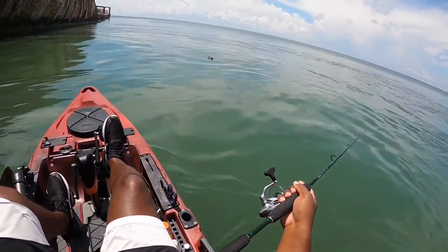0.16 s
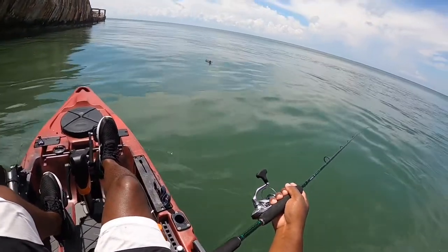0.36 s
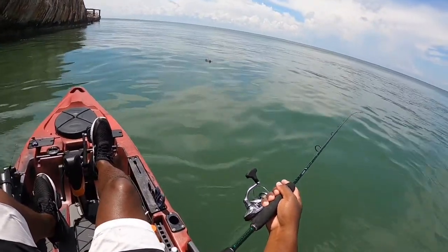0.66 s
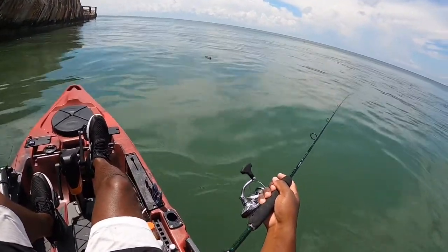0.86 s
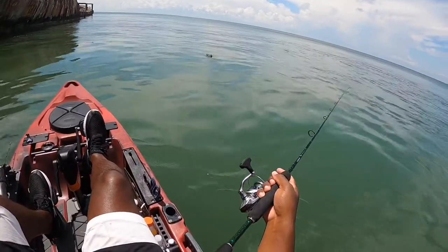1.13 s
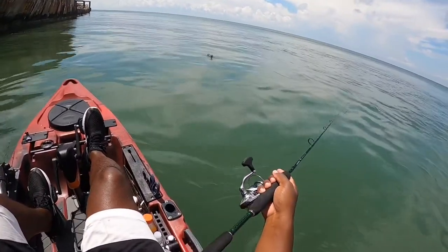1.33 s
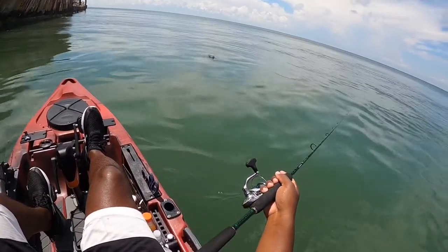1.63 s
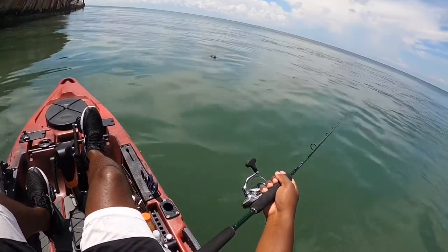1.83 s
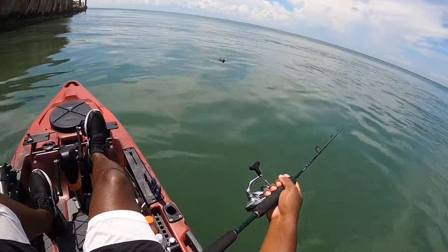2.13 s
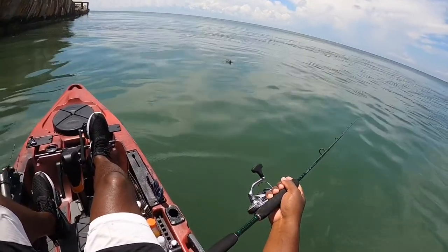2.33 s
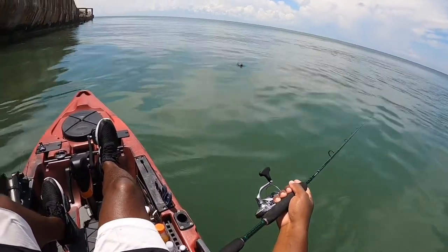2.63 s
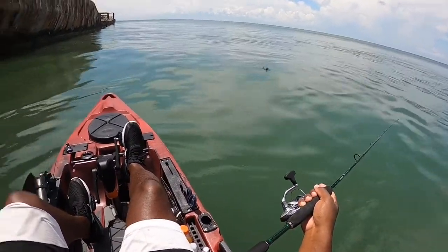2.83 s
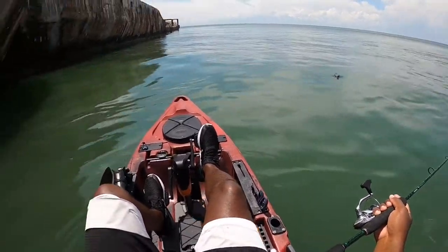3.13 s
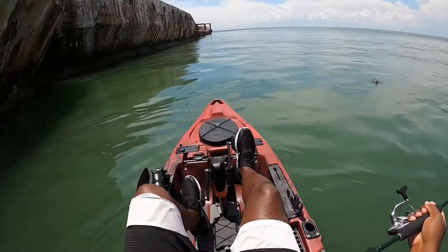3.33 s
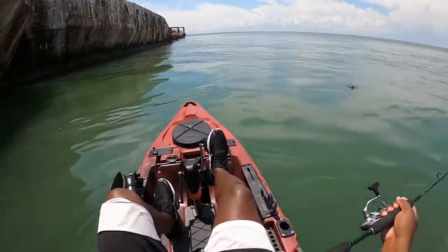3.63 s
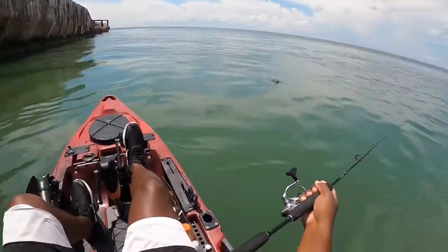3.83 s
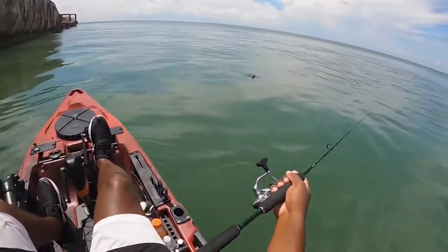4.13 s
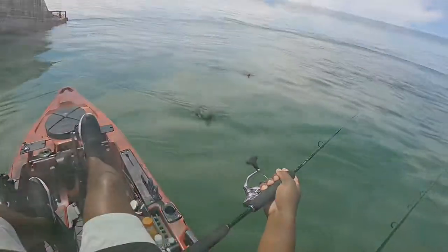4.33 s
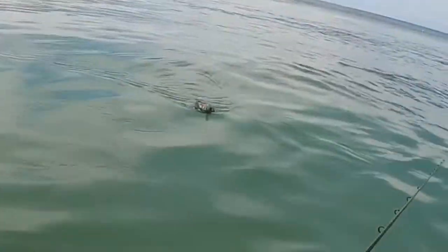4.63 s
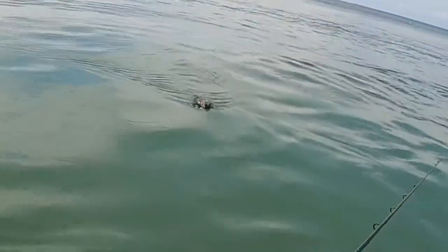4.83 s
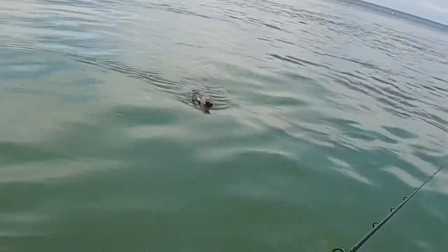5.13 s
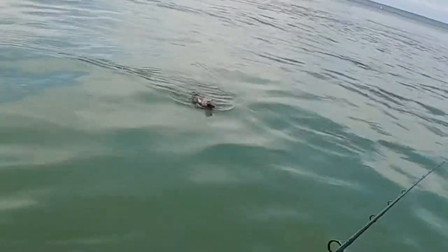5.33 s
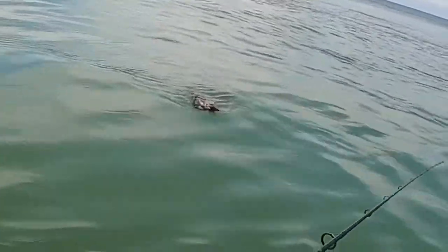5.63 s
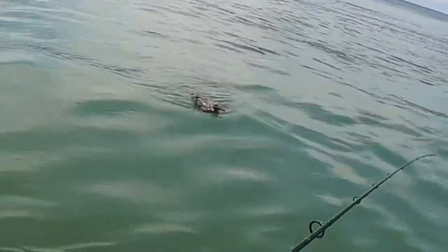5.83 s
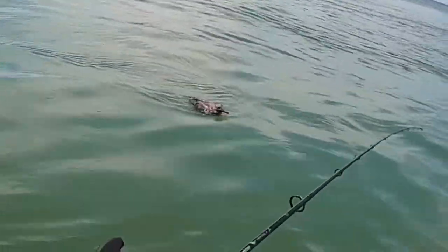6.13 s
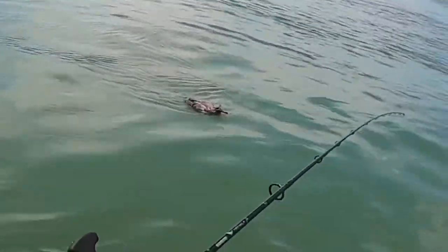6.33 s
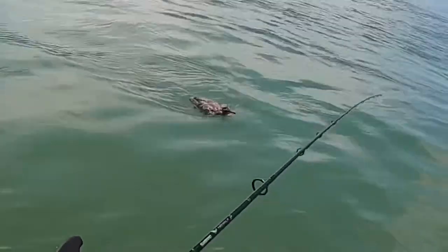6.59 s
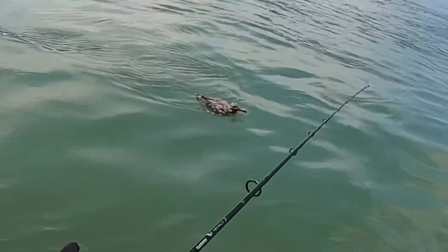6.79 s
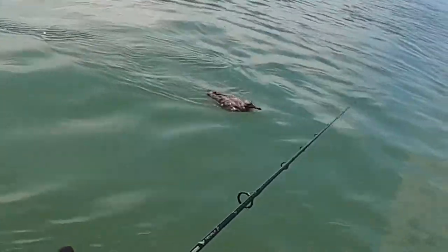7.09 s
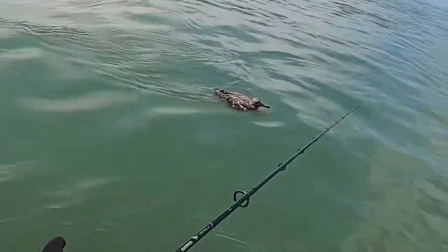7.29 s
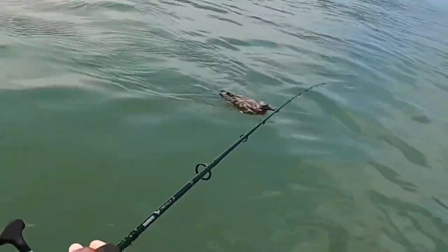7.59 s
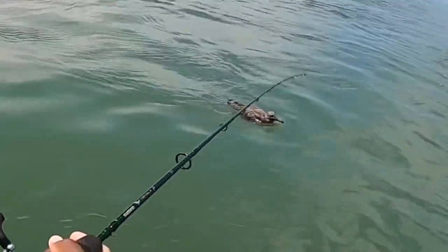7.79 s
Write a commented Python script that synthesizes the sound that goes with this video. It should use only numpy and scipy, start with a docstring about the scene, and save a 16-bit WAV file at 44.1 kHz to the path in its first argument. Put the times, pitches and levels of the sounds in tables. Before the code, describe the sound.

A gull chick close on the left gives short creaky peeps, mostly in pairs, and three much louder high wails that slide down and end in a rasp. Underneath, calm water rumbles softly against a hollow kayak hull and light wind puffs on the microphone, strongest near the end. A seabird whistles briefly at the start, and a colony cries very faintly far away.

```python
"""From a kayak on calm water: the hollow hull rumbles and light wind puffs on the microphone throughout.
A seabird whistles overhead at the start, and a colony murmurs far off. After a second, creaky gull
peeps begin close on the left, where a chick swims. Three long wails fall at about 2.5, 4.3 and 6.2 s;
each also arrives by a near bounce, so it swells and dips as its pitch slides. Two fainter whistles
and the strongest gusts come near the end."""
import sys
import numpy as np
from scipy import signal
from scipy.fft import rfft, irfft, next_fast_len
from scipy.io import wavfile
from scipy.ndimage import uniform_filter1d, map_coordinates

SR = 44100
rng = np.random.default_rng(int(sys.argv[2]) if len(sys.argv) > 2 else 0)


def dump_mix(stems):
    """Bounce the given channels to the path in sys.argv[1] as a 16-bit WAV at rate SR."""
    frames = np.atleast_2d(stems).T  # one column per channel
    limited = np.clip(frames, -1, 1)  # hard clip at full scale
    pcm = np.round(limited * 32767).astype(np.int16)
    wavfile.write(sys.argv[1], SR, pcm)


N = 350696
TOP_HZ = 15000  # band limit of the microphone


def amp(db):
    """Decibels to gain."""
    return 10 ** (np.asarray(db) / 20)


def unit(x):
    """Scale to rms 1."""
    return x / np.sqrt(np.mean(x ** 2) + 1e-20)


def along(points, hz):
    """Read (Hz, value) points on a log axis."""
    knots_hz, values = np.transpose(points)
    return np.interp(np.log(hz + 1), np.log(knots_hz + 1), values)


def curve(points):
    """Read (seconds, value) points at every sample."""
    return np.interp(np.arange(N) / SR, *np.transpose(points))


def wobble(rate, size):
    """A smooth random curve, rate knots a second."""
    knots = rng.standard_normal(int(size * rate / SR) + 4)
    return map_coordinates(knots, [np.arange(size) * rate / SR])


def flicker(count, size, depth_db, rate):
    """Gains that let each of count partials waver on its own."""
    return amp(depth_db * np.array([wobble(rate, size) for _ in range(count)]))


def envelope(t, attack_s, hold_s, release_s):
    """Gain that rises 60 dB up to t = 0, holds, then dies away by 60 dB."""
    return amp(-60 * (np.maximum(-t, 0) / attack_s + np.maximum(t - hold_s, 0) / release_s))


def fade(size, seconds):
    """A gate with soft ends."""
    return signal.windows.tukey(size, min(1, 2 * seconds * SR / size))


def filtered(x, response):
    """Filter x by a response given as a function of Hz."""
    size = x.shape[-1]
    padded = next_fast_len(size + 8192)
    return irfft(rfft(x, padded) * response(np.fft.rfftfreq(padded, 1 / SR)), padded)[..., :size]


def add(track, s, sound, pan_db=0):
    """Mix a sound into a stereo track at time s, pan_db louder on the left, keeping its power."""
    ratio = amp(pan_db)
    pair = np.array([sound * ratio, sound]) * np.sqrt(2 / (1 + ratio ** 2))
    start = max(0, round(s * SR))
    part = track[:, start:start + len(sound)]
    part += pair[:, :part.shape[1]]


def cycles(pitch, jitter, rate=900):
    """Phase in radians of a vibration whose pitch trembles."""
    return 2 * np.pi * np.cumsum(pitch * (1 + jitter * wobble(rate, len(pitch)))) / SR


def partials(phase, pitch, throat, orders, weights=1):
    """Lines on multiples of a pitch at rms 1; the throat colours them and smears each pulse."""
    k = np.asarray(orders)[:, None]
    gain = amp(along(throat, k * pitch)) * weights * (k * pitch < TOP_HZ)
    rms = np.sqrt((gain ** 2).sum(0) / 2 + 1e-12)
    return (gain * np.cos(k * phase - 2 * k ** 2)).sum(0) / rms


def noise(spectrum, size):
    """Coloured noise of rms 1."""
    return unit(filtered(rng.standard_normal(size), lambda hz: amp(along(spectrum, hz))))


def rush(spectrum, correlation, patchy_db):
    """Coloured stereo noise of rms 1 with drifting patches of gain."""
    frames = signal.stft(rng.standard_normal((2, N)), nperseg=1024)[2]
    patches = uniform_filter1d(rng.standard_normal(frames.shape[1:]), size=8, axis=0)
    patches = uniform_filter1d(patches, size=10, axis=1)
    pair = signal.istft(frames * amp(patchy_db * unit(patches)), nperseg=1024)[1][:, :N]
    width = np.arccos(correlation) / 2
    mid, side = filtered(pair, lambda hz: amp(along(spectrum, hz))) * [[np.cos(width)], [np.sin(width)]]
    return unit(np.array([mid + side, mid - side]))


def distant_hiss():
    """A faint hiss carries from far off on the left."""
    # Colour of the hiss. Each row: frequency in Hz, gain in dB.
    spectrum = [(300, 0.5), (500, 3.5), (800, -3), (1200, 2), (1700, -1), (2200, -5), (3300, -3),
                (4200, -6), (5300, -11), (6500, -15), (8000, -26), (10000, -36), (15000, -48.5)]
    # Its slow swell. Each row: time in seconds, level in dB.
    levels = [(0, -59), (.85, -70.5), (1.35, -63.5), (2.1, -61.5), (2.7, -63.5), (3.8, -62), (4.3, -63),
              (5.2, -65), (5.9, -61), (6.5, -69), (7.95, -60.5)]
    return amp(curve(levels)) * rush(spectrum, correlation=0.45, patchy_db=1.8) * amp([[1.7], [-1.7]])


def wind():
    """Gusts ride on a breeze that differs between the microphone's two ports."""
    # Colour of the wind. Each row: frequency in Hz, gain in dB.
    spectrum = [(15, -9.5), (32, 7.5), (60, 3.5), (100, -6.5), (150, -22.5), (300, -34.5), (600, -55.5),
                (1500, -100)]
    # The steady breeze. Each row: time in seconds, relative level in dB.
    breeze_levels = [(0.0, -38), (3.3, -47.5), (4.07, -27), (4.69, -48.5), (5.64, -38.5), (7.02, -43.5),
                     (7.48, -31.5), (7.95, -40)]
    # Gusts. Each row: time of full strength in seconds, hold in seconds, level in dB.
    gusts = [(.01, 0.013, -26.5), (.41, 0.097, -25), (0.943, 0.016, -30), (1.95, 0.013, -31),
             (2.41, 0.1, -31), (3.36, .1, -36), (3.77, 0.044, -26), (4.08, 0.11, -24.5),
             (5.02, 0.0093, -33), (5.58, 0.046, -29), (5.92, .02, -28.5), (6.52, .02, -27),
             (7.189, 0.17, -34), (7.55, 0.062, -16.5), (7.829, 0.025, -17)]
    t = np.arange(N) / SR
    gusting = sum(amp(db) * envelope(t - s, attack_s=0.26, hold_s=hold, release_s=0.51)
                  for s, hold, db in gusts)
    breeze = amp(curve(breeze_levels) + 3 + 2 * wobble(10, N))
    return np.hypot(breeze, gusting) * rush(spectrum, correlation=0.1, patchy_db=1)


def hull_water():
    """Water rumbles against the hollow hull, nearly alike in both ports."""
    # Resonance of the hull. Each row: frequency in Hz, gain in dB.
    spectrum = [(55, -12), (85, -2.5), (105, -8.5), (125, -0.5), (155, -3), (185, 0), (230, -8.5),
                (280, -18.5), (340, -24.5), (400, -27.5), (520, -39.5), (680, -63.5), (1200, -97)]
    # Strength of the rumble. Each row: time in seconds, relative level in dB.
    levels = [(0.0, -48), (1.66, -38), (2.21, -45.5), (4.38, -40.5), (4.63, -38.5), (6.33, -39),
              (7.71, -35.5), (7.95, -34)]
    lapping = amp(curve(levels) + 3.5 + 1.5 * wobble(14, N))
    return lapping * rush(spectrum, correlation=0.97, patchy_db=1.2)


def wind_puffs():
    """Eddies push on the microphone's ports for a few cycles, out of step with each other."""
    # Each row: centre and length in seconds, relative level in dB, eddy rate in Hz, left over right in dB.
    eddies = [(0.404, 0.052, -13, 60, -23), (0.419, 0.033, -13.5, 141, -23), (0.482, 0.044, -11, 89.4, -30),
              (0.498, 0.027, -11.5, 155, -19), (0.519, 0.052, -16, 77, -8.5),
              (4.104, 0.0463, -7.5, 69.6, -7), (4.17, 0.035, -25, 110.4, 8),
              (7.546, 0.0326, -9.5, 168, -5.5), (7.563, .035, -11, 116, -1.5),
              (7.58, 0.0144, -2.5, 202, -0.5), (7.596, 0.065, -19, 65.5, -7)]
    out = np.zeros((2, N))
    for s, length, db, hz, pan_db in eddies:
        size = int(length * SR)
        for port, share in enumerate(unit(amp([pan_db / 2, -pan_db / 2]))):
            phase = cycles(np.full(size, float(hz)), jitter=0.26, rate=166.6) + rng.uniform(0, 2 * np.pi)
            push = np.sin(phase) + 0.26 * np.cos(2 * phase) + 0.087 * np.sin(3 * phase)
            out[port, round(s * SR) - size // 2:][:size] += amp(db) * share * push * np.hanning(size)
    return filtered(out, lambda hz: 1 / np.sqrt(1 + (hz / 340) ** 8))  # slow air makes only dull pushes


def clicks():
    """Short clicks and knocks, each a ring in one band; the one at 4.664 s is a gull peep snapping shut."""
    # Each row: start in seconds, level in dB, pitch in Hz, seconds to die by 60 dB.
    rings = [(.004, -26.5, 183, 0.17), (.01, -49.5, 2550, 0.18), (0.053, -39.5, 404, 0.24),
             (.057, -48.5, 1610, 0.056), (0.475, -43.5, 1490, 0.025), (.632, -51.5, 1530, 0.034),
             (.735, -58, 5330, 0.019), (.835, -58.5, 1480, 0.059), (1.327, -53.5, 4600, 0.033),
             (2.231, -40.5, 1520, 0.028), (2.23, -48, 4240, 0.062), (2.95, -39.5, 400, 0.073),
             (2.981, -47.5, 3800, 0.031), (4.146, -48.5, 4240, 0.0137), (4.219, -43, 530, 0.049),
             (4.221, -48, 1420, 0.028), (4.664, -33, 1550, 0.024)]
    out = np.zeros((2, N))
    t = np.arange(SR // 3) / SR
    attack = 1 - np.exp(-t / 0.00068)
    for s, db, hz, t60 in rings:
        band = [(hz / 4, -35), (hz / 1.5, -12), (hz, 0), (hz * 1.4, -12), (hz * 4, -60)]
        add(out, s, noise(band, len(t)) * amp(db - 60 * t / t60) * attack, pan_db=2.5)
    return out


def sea_wall(x):
    """A diffuse echo comes back off the rough sea wall."""
    # Decay of the echo. Each row: frequency in Hz, seconds to die by 60 dB.
    decay = [(300, 0.46), (1500, 0.27), (5000, 0.26), (12000, 0.077)]
    hz, t, frames = signal.stft(rng.standard_normal((2, SR // 2)), SR, nperseg=256)
    tail = signal.istft(frames * amp(-60 * t / along(decay, hz)[:, None]), SR, nperseg=256)[1]
    return signal.fftconvolve(x.mean(0)[None], tail / np.linalg.norm(tail[0]), axes=1)[:, :N]


def colony_cries(per_second):
    """Rows for far_birds: the colony's fainter cries, at chance moments."""
    draws = rng.uniform(-1, 1, (int(per_second * N / SR), 6))
    middle = [N / SR / 2, 0.28, 1793, 0.8, -76.5, 0.8]
    spread = [N / SR / 2, 0.12, 170, 0.15, 3, 0.25]
    return list(middle + draws * spread)


def far_birds():
    """Thin cries far to the left rise a little and fall away, broken by quick dips of pitch and level."""
    # Each row: start and length in seconds, pitch in Hz, end pitch ratio, level in dB, rasp from 0 to 1.
    cries = [(0.221, 0.4, 1755, 0.92, -72.5, 0), (0.945, 0.32, 1780, 1, -70.5, 0.06),
             (1.328, 0.086, 1830, .9, -62.5, 0.16), (1.475, 0.42, 1683, 0.74, -66, 0.5),
             (1.98, 0.16, 1684, 0.83, -65, 0.27), (2.241, 0.12, 1660, 0.9, -66, 0.45),
             (2.714, 0.39, 1718, 0.78, -66.5, 0.48), (3.55, 0.41, 1750, 0.43, -63.5, 0.38),
             (3.75, 0.27, 1737, 0.57, -66, 0.65), (4.131, 0.13, 1733, 0.97, -67.5, 0.2),
             (4.65, 0.09, 1785, 0.7, -63.5, 0.37), (4.979, 0.089, 1690, 0.81, -66.5, 0.2),
             (5.691, 0.1, 1806, 0.91, -60, 0.45), (6.611, 0.23, 1802, 0.88, -63, 0.18),
             (6.824, 0.21, 1402, 0.51, -63, 0.95), (7.188, 0.3, 1483, 0.86, -63, 0.69),
             (7.568, 0.1, 1780, 1, -58, 1)]
    # The seabirds' throat. Each row: frequency in Hz, gain in dB.
    throat = [(1300, -14.5), (1800, 1), (2600, 4.5), (3500, 0.5), (5200, -2.5), (7000, -22.5),
              (9000, -43.5)]
    out = np.zeros((2, N))
    orders = np.arange(1, 5)
    for s, length, hz, end_ratio, db, rasp in cries + colony_cries(per_second=7):
        size = int(length * SR)
        progress = np.arange(size) / SR / length
        dips = np.sin(cycles(np.full(size, 40.0), jitter=0.2, rate=30) / 2) ** 6
        contour = 1 - 0.032 * np.exp(-progress / 0.14) - (1 - end_ratio) * progress ** 3
        pitch = hz * contour * (1 - (0.023 + 0.049 * rasp) * dips)
        weights = flicker(len(orders), size, depth_db=3, rate=30)
        cry = partials(cycles(pitch, jitter=0.004 + 0.014 * rasp), pitch, throat, orders, weights)
        add(out, s, amp(db - 6 * dips) * cry * fade(size, 0.025), pan_db=5)
    return out


def whistles():
    """A seabird overhead whistles high arched notes, strongest on their second harmonic."""
    # Each row: start and length in seconds, first, top and last pitch in Hz, relative level in dB.
    notes = [(.005, 0.072, 3100, 3360, 2980, -35), (0.096, 0.047, 2720, 3090, 2680, -39),
             (0.172, 0.031, 2750, 2890, 2740, -38.5), (7.005, 0.03, 3000, 2930, 2800, -54),
             (7.497, 0.027, 2955, 2880, 2670, -45.5)]
    # Timbre of the whistle. Each row: multiple of the pitch, gain in dB.
    harmonics = [(1, -2.5), (2, 4), (3, -26)]
    out = np.zeros((2, N))
    for s, length, start_hz, top_hz, end_hz, db in notes:
        progress = np.linspace(0, 1, int(length * SR))
        arch = np.sin(np.pi * progress ** 1.3) ** 2
        foot_hz = np.where(progress ** 1.2 < 0.5, start_hz, end_hz)
        phase = cycles(foot_hz + (top_hz - foot_hz) * arch, jitter=0.018)
        note = sum(amp(level) * np.sin(k * phase) for k, level in harmonics)
        add(out, s, amp(db + 8.5 * (arch - 2.5)) * note * fade(len(note), 0.0032), pan_db=-3)
    return out


def creak(snap_hz, jitter, shimmer_db, band_hz):
    """The slack syrinx snaps slowly and unevenly; each pulse rings the throat."""
    # Throat resonances. Each row: centre in Hz, width in Hz, gain in dB.
    modes = [(530, 70, -7.5), (1030, 540, -4.5), (1473, 231, 4.5), (1777, 179, 0.5), (2500, 280, -19.5),
             (4220, 780, -28.5), (5920, 1300, -40)]

    def throat(hz):
        return sum((-1) ** k * amp(db) * 1j * hz * width / (centre ** 2 - hz ** 2 + 1j * hz * width)
                   for k, (centre, width, db) in enumerate(modes))

    size = len(snap_hz)
    turns = cycles(snap_hz, jitter, rate=250) / (2 * np.pi)
    snaps = np.diff(np.floor(turns), prepend=0) * amp(shimmer_db * rng.standard_normal(size))
    hiss = 0.45 * rng.standard_normal(size)
    band = signal.butter(3, band_hz, "bandpass", fs=SR, output="sos")
    return unit(signal.sosfilt(band, filtered(unit(snaps) + hiss, throat)))


def from_left(x, lag_ms):
    """Sound from the left reaches the right port a little later."""
    return np.array([x[0], filtered(x[1], lambda hz: np.exp(-2j * np.pi * hz * lag_ms / 1000))])


def peeps():
    """Each nearby peep creaks open, arches through a clear note with half-pitch lines, and creaks shut."""
    # Each row: time of the top in seconds, top pitch in Hz, then level, half-pitch lines
    # and left over right, all in dB.
    calls = [(1.013, 1002, -32, -6.5, 4.5), (1.24, 973, -32, -11, 3.5), (1.975, 1025, -28.5, -4.5, 6.5),
             (2.180, 986, -29.5, 1, 5.5), (3.487, 1053, -28.5, -2, 20), (3.672, 1045, -30, -6, 18),
             (4.628, 1046, -29.5, -5, 4.5), (4.828, 1012, -31, -1, 5), (6.396, 1001, -32.5, 3.5, 5.5),
             (6.590, 978, -34, -19, 2), (7.925, 999, -30.5, -7.5, 2)]
    # The gull's throat and bill. Each row: frequency in Hz, gain in dB.
    throat = [(450, -31.5), (750, -13), (1000, -5.5), (1500, -0.5), (2000, 1.5), (2250, -15), (2550, -21.5),
              (3100, -21), (4100, -20.5), (5000, -29.5), (6500, -53.5), (9500, -48.5), (14000, -83.5)]
    length_s, end_droop = 0.085, 0.21
    out = np.zeros((2, N))
    t = np.arange(-length_s / 2, length_s / 2, 1 / SR)
    arch = 1 - end_droop * (2 * t / length_s) ** 2
    clear = envelope(t + 0.009, attack_s=0.032, hold_s=0.019, release_s=0.086)
    opening = amp(-2) * envelope(t + 0.03, attack_s=0.04, hold_s=0.02, release_s=0.035)
    closing = amp(-6) * envelope(t - 0.035, attack_s=0.016, hold_s=0.003, release_s=0.02)
    orders = np.arange(1, 25) / 2
    for s, hz, db, half_db, pan_db in calls:
        pitch = hz * arch
        # the half-pitch lines fade towards the treble
        weights = np.where(orders % 1, amp(half_db - 3.9 * np.clip(orders - 2.5, 0, 2)), 1)[:, None]
        weights = weights * flicker(len(orders), len(t), depth_db=2.2, rate=45)
        note = partials(cycles(pitch, jitter=0.014), pitch, throat, orders, weights)
        rasp = creak(pitch * 1.35 / 4, jitter=0.088, shimmer_db=2.5, band_hz=(997, 2800))
        voice = clear * note + (opening + closing) * rasp
        add(out, s + t[0], amp(db) * voice * fade(len(t), 0.0031), pan_db)
    return out


def near_bounce(x, strength_db):
    """Direct sound and a near bounce interfere at evenly spaced pitches; the right port lies in shadow."""
    # Paths to the left port, then the right. Each row: direct gain in dB, relative bounce gain in dB,
    # bounce delay in milliseconds.
    paths = [(1.5, -6.66, 3.07), (-20, -6.5, 3.05)]
    ports = []
    for port, (direct_db, bounce_db, delay_ms) in zip(x, paths):
        direct, bounce = amp(direct_db), amp(bounce_db + strength_db)
        delay_s = delay_ms / 1000
        ports.append(filtered(port, lambda hz: direct + bounce * np.exp(-2j * np.pi * hz * delay_s)))
    return np.array(ports)


def wail_voice(pitch, snap_hz, rough, tone_db, overtone_db):
    """A strong fundamental under wavering overtones; roughness trades both for creak and hiss."""
    # Colour of the overtones. Each row: frequency in Hz, gain in dB.
    throat = [(1800, 0), (2500, 7), (3100, 3), (3500, 1.5), (4000, 5), (4600, 0), (5250, -0.5),
              (5800, -1.5), (6400, -12.5), (7100, -21), (9000, -25), (13000, -37), (15500, -61.5)]
    size = len(pitch)
    phase = cycles(pitch, jitter=0.0024 + 0.05 * rough ** 2)
    clear = np.sqrt(1 - rough ** 2)
    rasp = creak(snap_hz, jitter=0.035, shimmer_db=4, band_hz=(430, 2820))
    tone = clear * np.sqrt(2) * np.cos(phase) + rough * rasp
    orders = np.arange(2, 15)
    weights = flicker(len(orders), size, depth_db=3, rate=45)
    slip = 0.04 * wobble(500, size)  # small slips of timing blur the high overtones most
    overtones = clear * partials(phase + slip, pitch, throat, orders, weights)
    hiss = (0.053 + 0.5 * rough ** 2) * noise(throat, size)
    release = np.clip(np.arange(size)[::-1] / (0.018 * SR), 0, 1)
    return (amp(tone_db) * tone + amp(overtone_db) * (overtones + hiss)) * fade(size, 0.0018) * release


def wails():
    """A near gull creaks into a low note, leaps up a register, then fades as it falls back into creak."""
    # Each row: time of the leap, low note before it and clear voice after it in seconds, tone in dB,
    # its fade in dB/s, overtones in dB, their fade in dB/s, bounce strength in dB.
    calls = [(2.478, .025, 0.18, -13, 79, -29.5, 97, -1), (4.336, .014, .25, -17, 39.5, -31.5, 55, -2),
             (6.192, 0.023, .218, -13.5, 64, -31.5, 56.5, 0)]
    # The fall of pitch, one list a wail. Each row: time in seconds, pitch in Hz.
    falls = [
        [(2.482, 1580), (2.53, 1500), (2.574, 1377), (2.602, 1208), (2.63, 1068), (2.64, 1001), (2.665, 912)],
        [(4.34, 1529), (4.41, 1509), (4.474, 1364), (4.512, 1199), (4.554, 1113), (4.576, 967), (4.6, 915)],
        [(6.198, 1574), (6.27, 1485), (6.296, 1368), (6.32, 1250), (6.362, 1157), (6.41, 1063), (6.422, 961),
         (6.44, 917)],
    ]
    lead_s, leap_s, tail_onset_s, tail_s = 0.039, 0.0015, 0.026, 0.072  # lead and tail are the creaks
    lead_snap_hz, low_hz = 526.6, 1349
    low_climb, tail_sink = 4800, 940  # Hz/s
    lead_swell, lead_brighten, low_swell, tail_dull = 378, 796, 218, 262.5  # dB/s
    out = np.zeros((2, N))
    for (s, low_s, clear_s, db, tone_fade, over_db, over_fade, bounce_db), fall in zip(calls, falls):
        t = np.arange(-low_s - lead_s, clear_s + tail_s, 1 / SR)  # zero at the leap
        until_low = np.maximum(-low_s - t, 0)
        into_fall = np.clip(t, 0, clear_s)
        into_tail = np.maximum(t - clear_s, 0)
        opening = np.clip(until_low / leap_s, 0, 1)
        low = np.clip(0.5 - t / leap_s, 0, 1)

        high_hz = np.interp(s + t, *np.transpose(fall)) - tail_sink * into_tail
        pitch = low * (low_hz + low_climb * t) + (1 - low) * high_hz
        snap_hz = np.where(t < 0, lead_snap_hz, pitch / 3)
        crack = 0.26 * np.exp(-(t / leap_s) ** 2)
        closing = 0.72 * np.clip(into_tail / tail_onset_s, 0, 1)
        rough = np.clip(opening + crack + closing, 0, 1)

        onset_db = -6.5 * opening - lead_swell * until_low + low_swell * np.clip(t, -low_s, 0)
        tone_db = db + onset_db - tone_fade * into_fall
        dull_db = lead_brighten * until_low + over_fade * into_fall + tail_dull * into_tail
        overtone_db = over_db + low - dull_db  # the low note is 1 dB brighter
        call = np.zeros((2, N))
        add(call, s + t[0], wail_voice(pitch, snap_hz, rough, tone_db, overtone_db))
        out += near_bounce(call, bounce_db)
    return out


def scene():
    """Near gulls and distant birds with their echo off the sea wall, over the boat and the weather."""
    gulls = wails() + from_left(peeps(), lag_ms=0.061)
    distant = far_birds() + whistles()
    echo = amp(-19) * sea_wall(gulls) + amp(-9) * sea_wall(distant)
    return gulls + distant + echo + wind_puffs() + clicks() + wind() + hull_water() + distant_hiss()


def record(dry):
    """The microphone keeps nothing above its band limit."""
    return filtered(dry, lambda hz: hz < TOP_HZ)


dry = scene()
out = record(dry)
dump_mix(out)
```